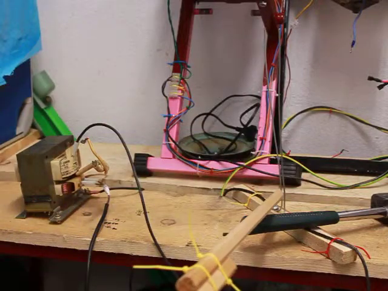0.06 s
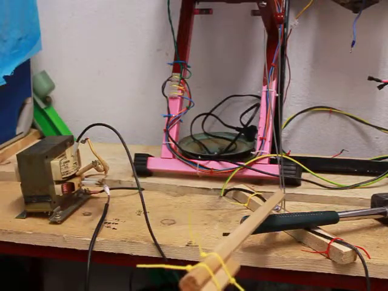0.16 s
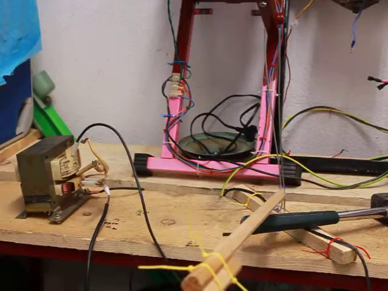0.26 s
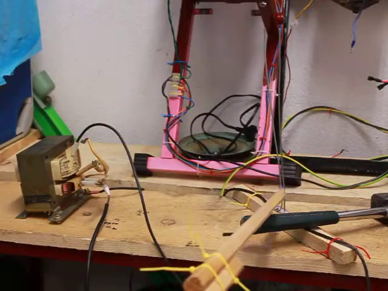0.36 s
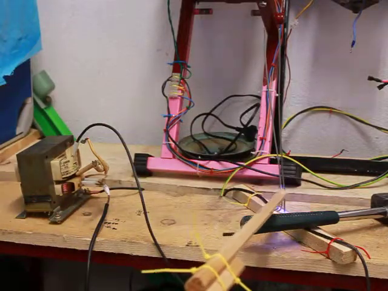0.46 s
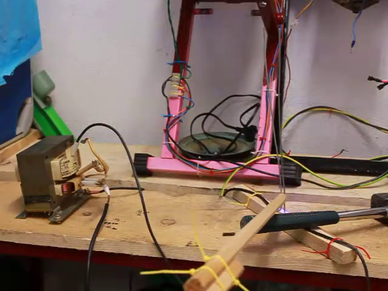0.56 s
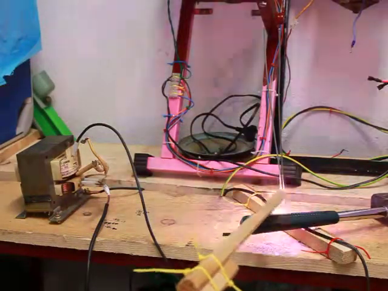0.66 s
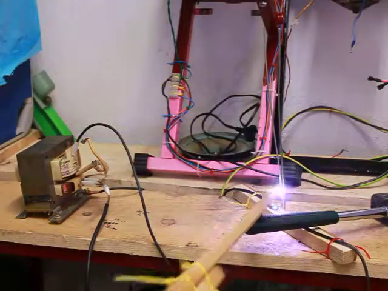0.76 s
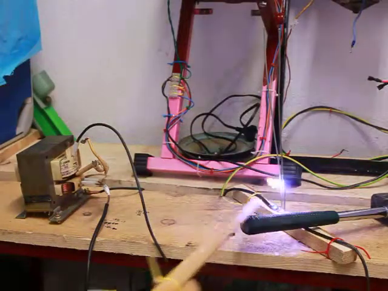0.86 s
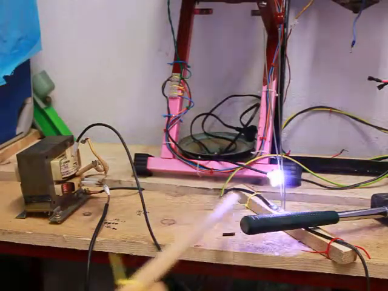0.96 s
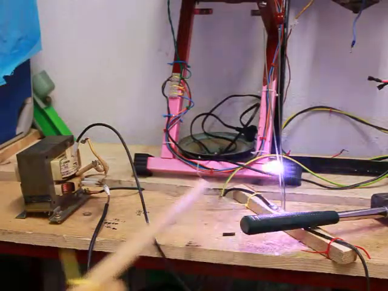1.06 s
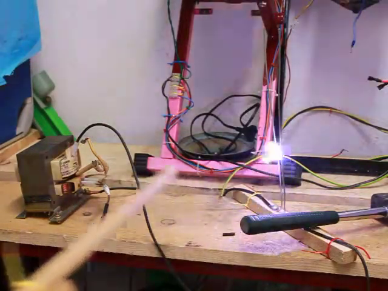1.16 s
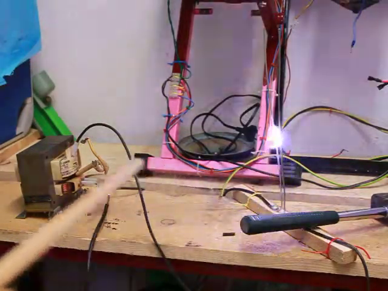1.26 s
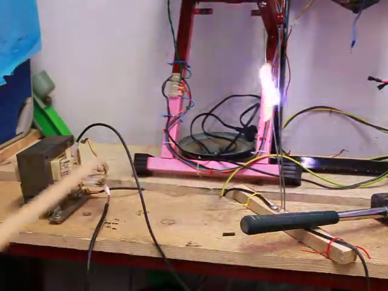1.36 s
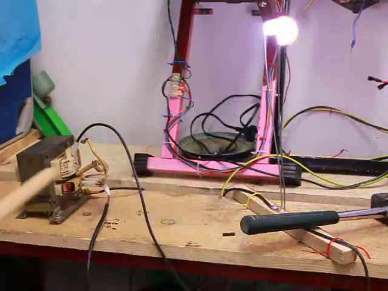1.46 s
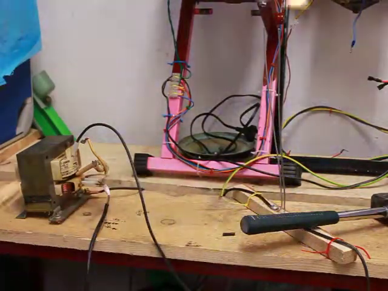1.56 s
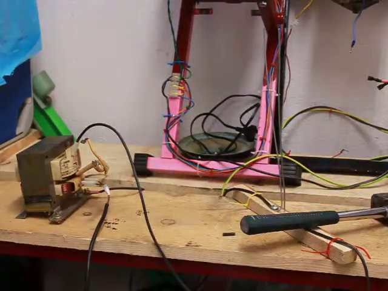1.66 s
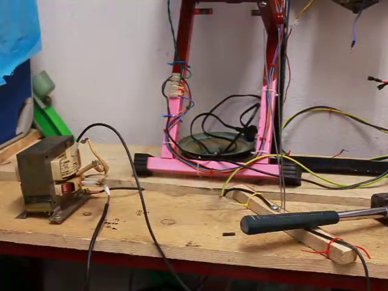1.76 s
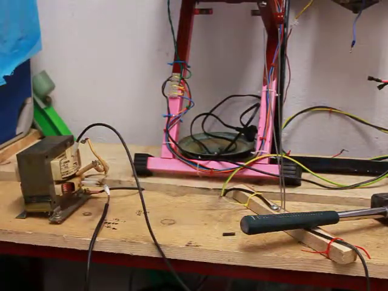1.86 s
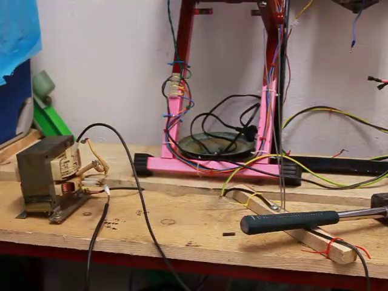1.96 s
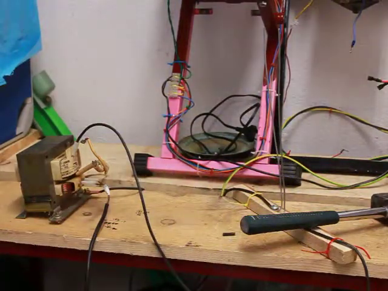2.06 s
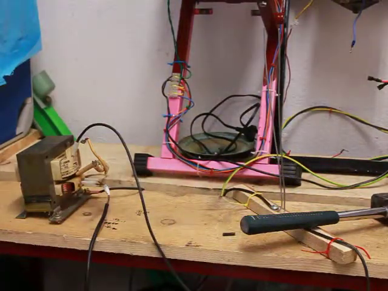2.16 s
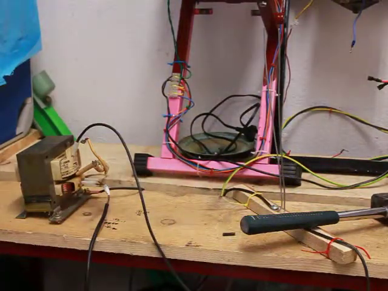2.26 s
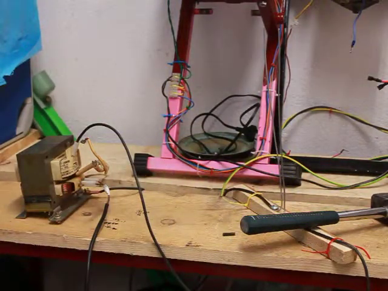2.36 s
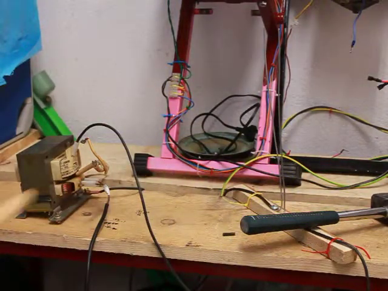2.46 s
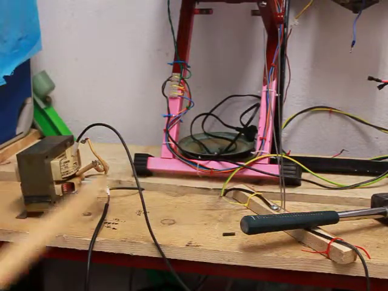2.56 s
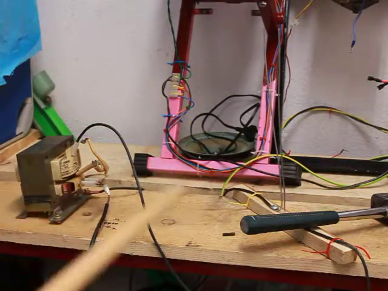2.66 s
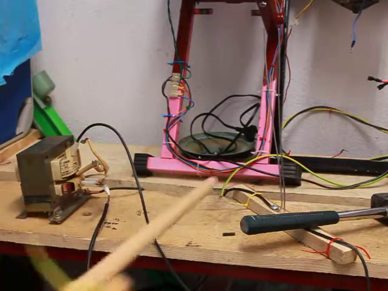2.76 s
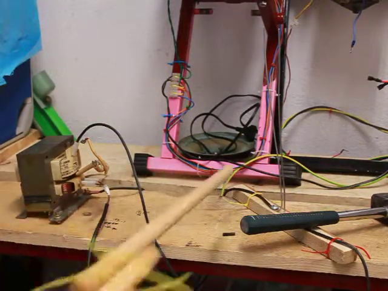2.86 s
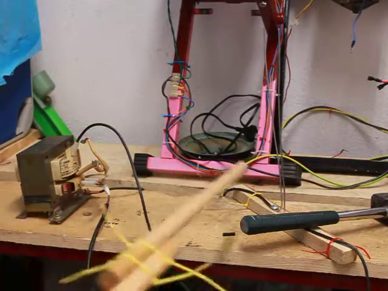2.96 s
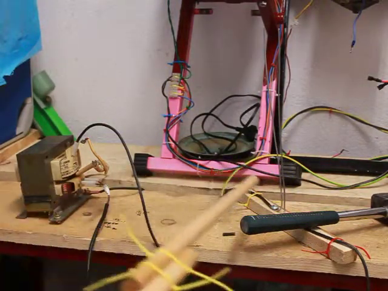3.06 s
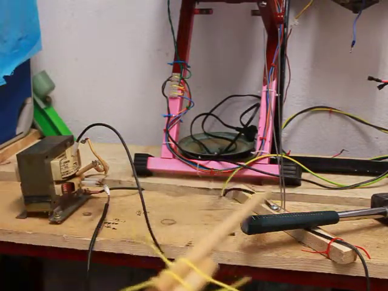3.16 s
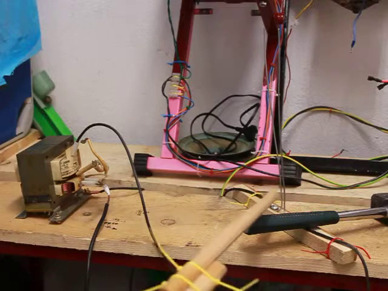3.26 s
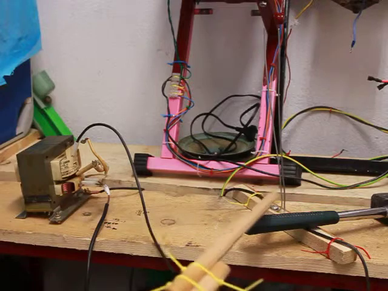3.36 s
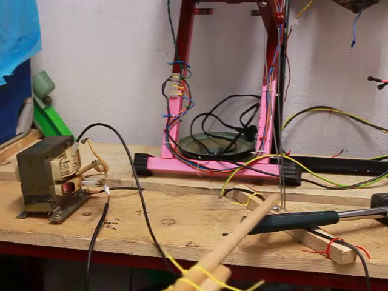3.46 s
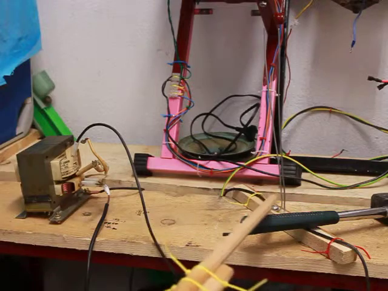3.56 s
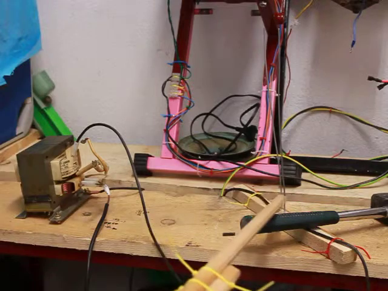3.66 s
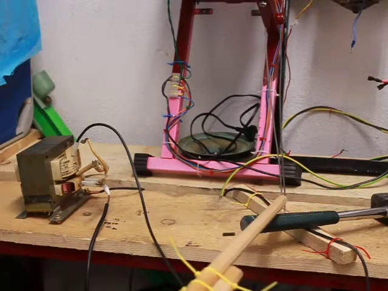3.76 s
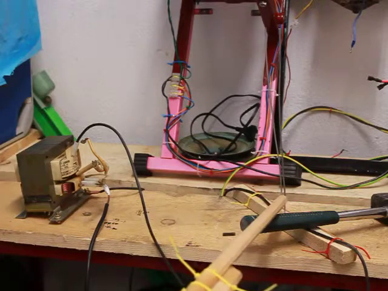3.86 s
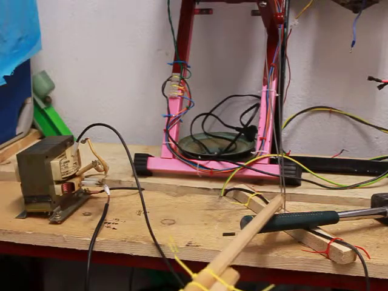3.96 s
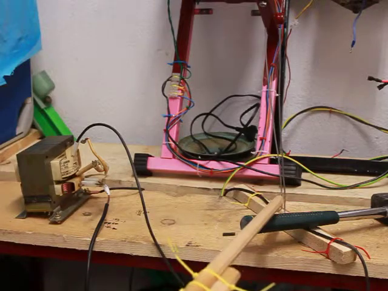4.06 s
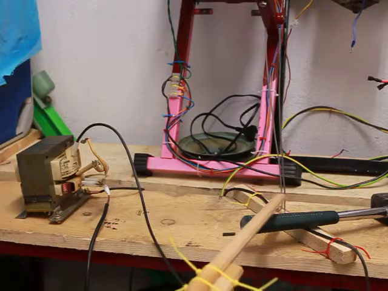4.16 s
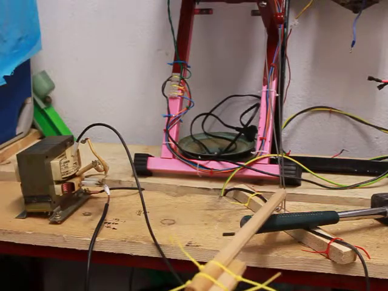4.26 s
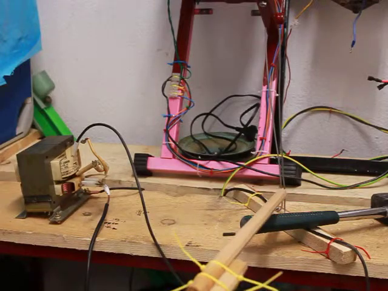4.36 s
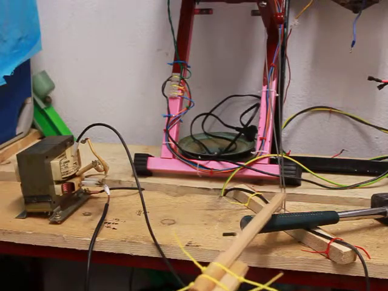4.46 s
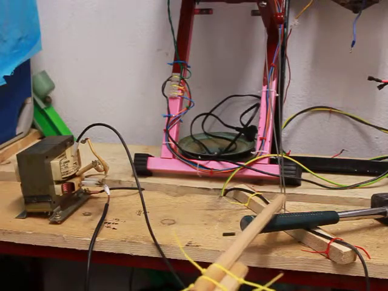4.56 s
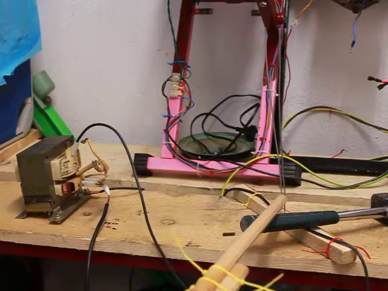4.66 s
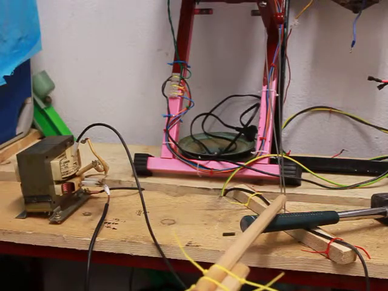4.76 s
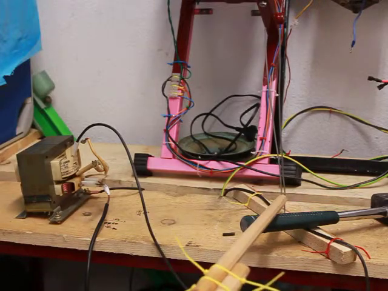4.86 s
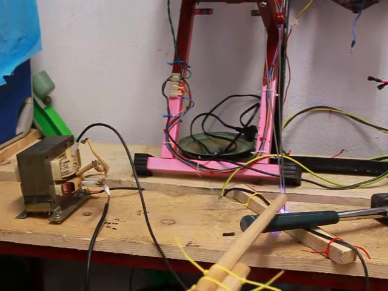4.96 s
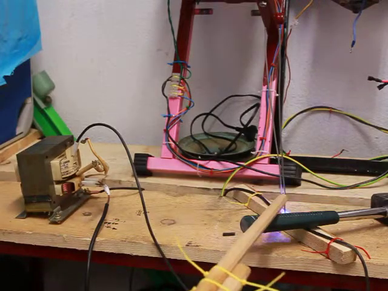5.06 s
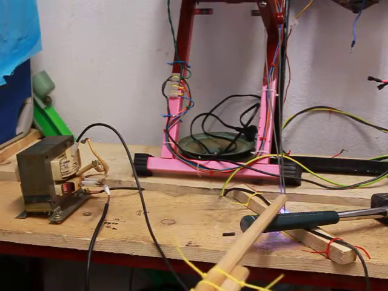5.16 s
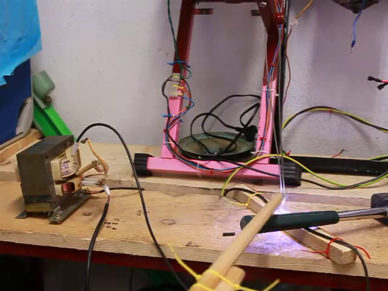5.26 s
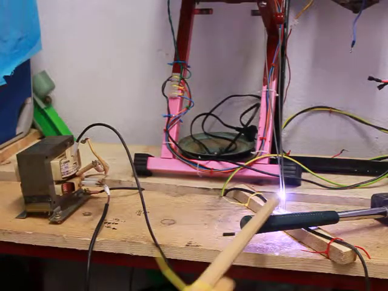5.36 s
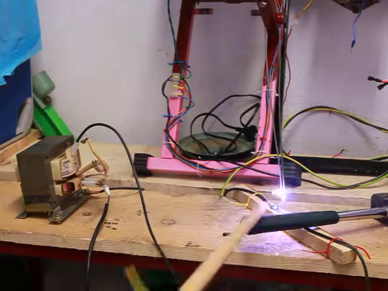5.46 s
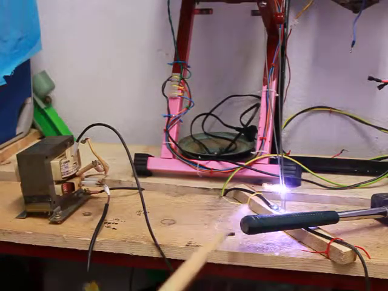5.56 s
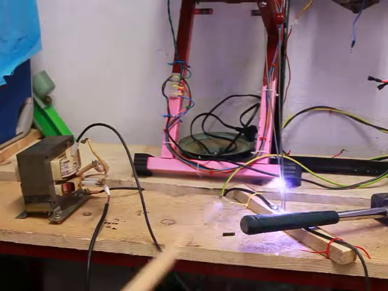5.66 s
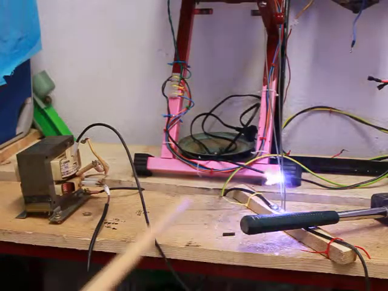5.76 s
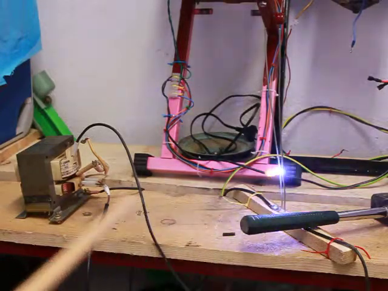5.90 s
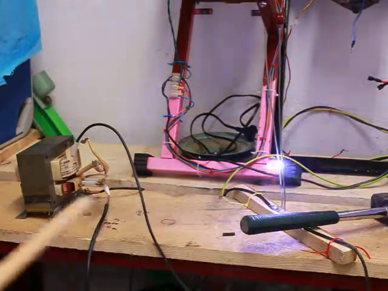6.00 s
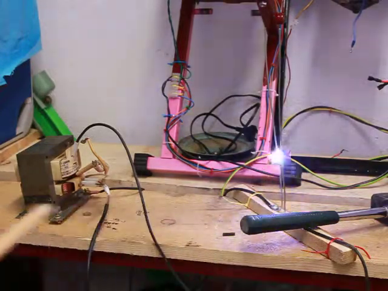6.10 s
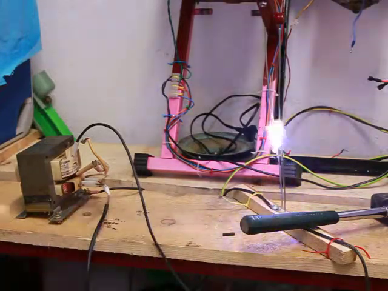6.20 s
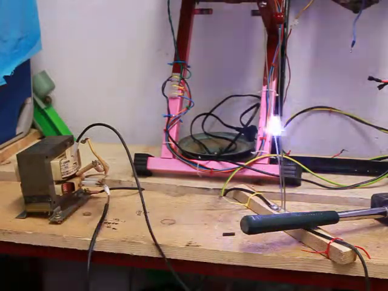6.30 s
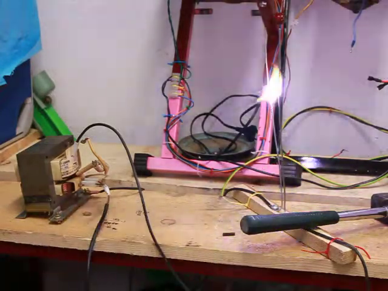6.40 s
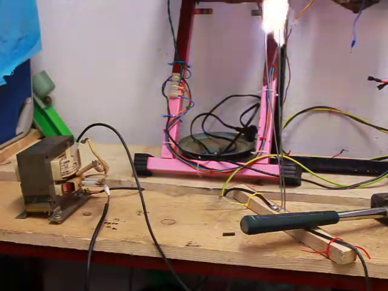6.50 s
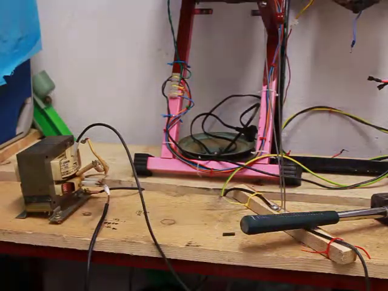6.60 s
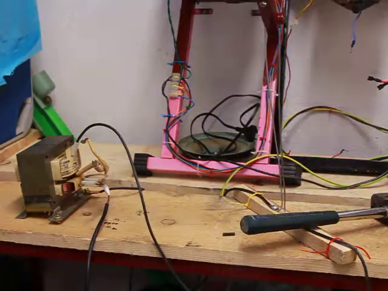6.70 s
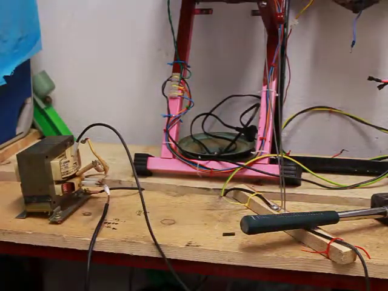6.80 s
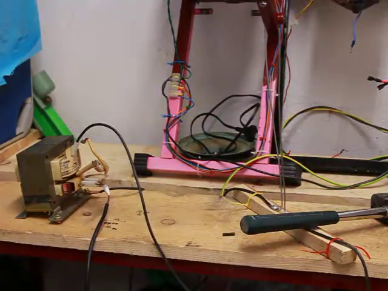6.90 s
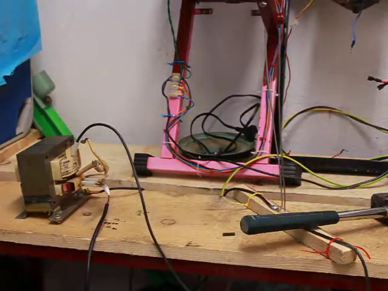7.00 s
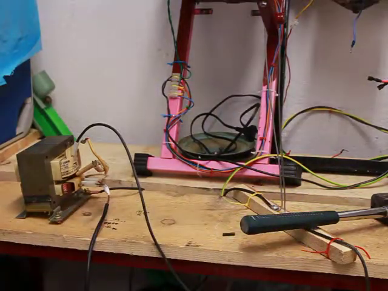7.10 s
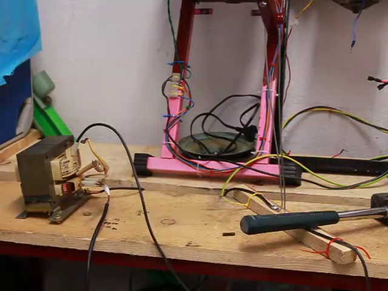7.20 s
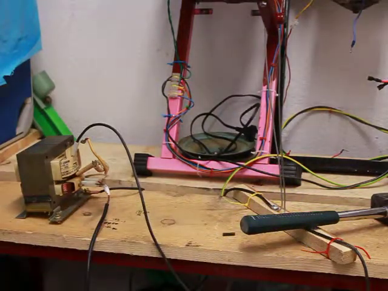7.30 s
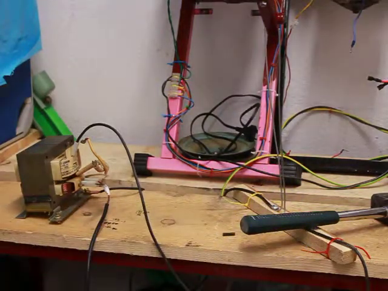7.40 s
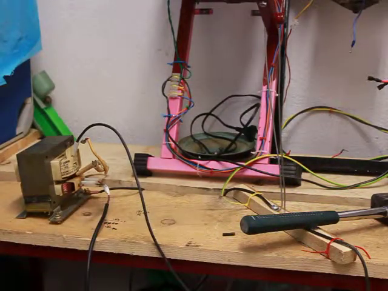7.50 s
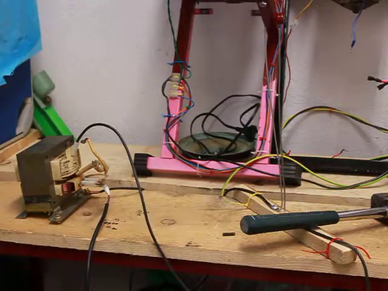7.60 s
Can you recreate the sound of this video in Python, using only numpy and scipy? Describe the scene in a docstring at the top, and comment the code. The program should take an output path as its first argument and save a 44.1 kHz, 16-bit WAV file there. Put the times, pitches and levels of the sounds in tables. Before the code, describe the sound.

Close view of a workbench in a small room, faint mains hum throughout. A nail on a stick taps thin wires, a spark snaps and a sizzling arc swells into a harsh buzz, grows fluttery and flamelike, and stops abruptly. Soft scraping, a click and light metallic taps follow, then sharper snaps start a second similar arc, which also cuts out, leaving only hum and room air.

```python
"""A nail on a wooden stick taps two upright wires over a faint transformer hum and the air of a workshop.
Twice it strikes an arc, which sizzles, buzzes at twice the mains rate, stretches into a flame and goes out.
The stick also rubs and clicks, and single sparks snap. Knocks, sparks and rubs are shaped noise, rings are
fading sine waves, and the arc is a train of pressure pulses with tiny clicks. All but hum and air,
and the arc's dry ticks, get a short room tail."""
import sys
import numpy as np
from scipy import signal
from scipy.fft import rfft, irfft, next_fast_len
from scipy.io import wavfile
from scipy.ndimage import uniform_filter1d

SR = 44100
rng = np.random.default_rng(int(sys.argv[2]) if len(sys.argv) > 2 else 0)


def store_wav(level_fs):
    """Save 16-bit WAV to argv[1]."""
    pcm = np.round(np.clip(np.atleast_2d(level_fs), -1, 1) * 32767)
    wavfile.write(sys.argv[1], SR, pcm.T.astype(np.int16))


N = 336924
T = np.arange(N) / SR  # time in seconds
MAINS_HZ = 50.03


def undb(db):
    """Turn decibels into a gain."""
    return np.exp(np.log(10) / 20 * np.asarray(db))


def unit(x):
    """Scale to an rms of 1."""
    return x / np.sqrt(np.mean(x ** 2))


def in_band(x, lo, hi):
    """Scale the whole sound so that its part between lo and hi Hz has an rms of 1."""
    f = np.fft.rfftfreq(len(x), 1 / SR)
    band = rfft(x)[(f > lo) & (f < hi)]
    return x * len(x) / np.sqrt(2 * np.sum(abs(band) ** 2))


def convolve(x, response):
    """Pass x through a response, keeping its length."""
    return signal.fftconvolve(x, response)[:len(x)]


def colour(x, points, size=4096):
    """Filter through (Hz, dB) points without smearing any sound ahead of its start."""
    hz, db = np.transpose(points)
    f = np.fft.rfftfreq(size, 1 / SR)
    curve_db = np.interp(np.log(f + 1), np.log(hz), db)
    # folding the cepstrum onto its first half gives the minimum-phase filter
    cepstrum = irfft(np.log(undb(curve_db)))
    cepstrum[1:size // 2] *= 2
    cepstrum[size // 2 + 1:] = 0
    return convolve(x, irfft(np.exp(rfft(cepstrum))))


def walk(rate):
    """Wander at random with a spread near 1, heading for a new value rate times a second."""
    knots = rng.standard_normal(int(T[-1] * rate) + 2)
    return np.interp(T * rate, np.arange(len(knots)), knots)


def fade(t, t60):
    """Die away by 60 dB in t60 seconds."""
    return np.exp(-np.log(1000) * t / t60)


def ramp(start, end):
    """Rise from 0 to 1 between two times."""
    return np.clip((T - start) / (end - start), 0, 1)


def swell(s, half_s):
    """Rise smoothly to 1 at time s and fall back."""
    return np.exp(-np.minimum(((T - s) / half_s) ** 2, 20))


def add(track, s, sound):
    """Mix a sound into a track at time s."""
    i = max(int(s * SR), 0)
    track[i:i + len(sound)] += sound[:N - i]


def grains(per_s, spread_db):
    """Tiny clicks at random times, most of them small and a few large."""
    sizes = undb(spread_db * np.minimum(rng.exponential(size=N), 5))
    present = rng.random(N) < per_s / SR
    return unit(present * sizes * rng.choice([-1, 1], N))


def ring(modes, low_db=0, high_db=0):
    """Metal or wood rings after one blow; chance shifts each mode's pitch a little and its level."""
    t = T[:SR // 2]
    total = 0
    chance = rng.standard_normal((len(modes), 2)) * [2.8, .006]  # dB, share of the pitch
    for (hz, db, t60), (luck_db, shift) in zip(modes, chance):
        level_db = db + (high_db if hz > 4300 else low_db) + luck_db
        tone = np.sin(2 * np.pi * (hz * (1 + shift) * t + rng.random()))
        total = total + undb(level_db) * fade(t, t60) * tone
    return total


def workshop(x, wet_db, low_t60=0.25, high_t60=0.13):
    """The room adds a dense short tail, whose treble dies first, to the direct sound."""
    t = T[:SR // 2]
    noise = rng.standard_normal(len(t))
    low = signal.sosfilt(signal.butter(1, 4000, fs=SR, output="sos"), noise)
    tail = low * fade(t, low_t60) + (noise - low) * fade(t, high_t60)
    tail *= t > .002  # the tail starts after 2 ms
    response = undb(wet_db) * tail / np.linalg.norm(tail)
    response[0] = 1  # direct sound
    return convolve(x, response / np.linalg.norm(response))


# The tones of the humming iron core.
# Each row: multiple of the mains rate, rms level in dB around which it wavers while no arc burns.
HUM_TONES = [(2, -71), (4, -52.5), (5, -80.5), (6, -66), (8, -70), (10, -63.5), (14, -76.5), (16, -79.5),
             (20, -73), (24, -78)]


def hum(load):
    """The iron core flexes with the mains and wavers slightly; current drawn by an arc makes it hum harder."""
    total = 0
    for k, db in HUM_TONES:
        tone = np.sin(2 * np.pi * (k * MAINS_HZ * T + rng.random()))
        total = total + np.sqrt(2) * undb(db + 0.4 * walk(24.0)) * tone
    return total * undb(4.7 * load)


# The tone colour of the room noise. Each row: frequency in Hz, relative level in dB.
AIR_COLOUR = [(25, 20), (60, 3.5), (110, 9.5), (230, 16), (420, 8.5), (700, 8), (2000, 5.5), (4500, 3.5),
              (9000, -1), (16000, -4)]
AIR_DB = -60.5  # rms level between 1 and 15 kHz


def air():
    """Faint, nearly steady room noise is made of coloured random values."""
    noise = in_band(colour(rng.standard_normal(N), AIR_COLOUR), 1000, 15000)
    return noise * undb(AIR_DB + 0.13 * walk(6.9))


# The moments when the nail meets the wires.
# Each row: start in seconds, then levels in dB before the room: clack, low ring, high ring, bright tick.
NAIL_TAPS = [(0.0014, -35.5, -47.5, -48, -35), (0.173, -28, -40, -46, -29.5),
             (0.2125, -31.5, -47.5, -53, -30.5), (3.7208, -37.5, -63, -62, -71),
             (4.139, -36.5, -51, -53, -53), (4.25, -34.5, -43, -51, -42), (4.6382, -47, -60, -51.5, -69),
             (4.711, -42, -54, -52, -51), (4.748, -50, -68, -50, -48.5), (4.874, -40, -46, -41, -34.5),
             (4.916, -45, -51, -44, -24.5)]
# The ways the nail and wires ring together.
# Each row: pitch in Hz, relative level in dB, time to fade by 60 dB in seconds.
WIRE_MODES = [(1191.3, 0.5, 0.073), (1605, 0, 0.094), (1785, -1, 0.072), (1945, 3, 0.046), (2680, -6, 0.13),
              (2750, -8.5, 0.14), (3190, -8.5, 0.24), (3634, -4.5, 0.17), (4000, -9, 0.11),
              (4630, -5.5, 0.18), (4860, -11, 0.35), (5170, -20, 0.18), (7700, -16, 0.17), (8230, -21, .14),
              (8700, -18, 0.2), (10700, -32, 0.12), (12080, -23, 0.16)]
# The ways the nail itself pings on its hardest landing.
# Each row: pitch in Hz, relative level in dB, time to fade by 60 dB in seconds.
NAIL_MODES = [(4360, -1.5, 0.097), (5250, -6, 0.078), (5400, -1, 0.072)]
PING_S, PING_DB = 4.916, -34  # start in seconds, level added to the nail's modes


def taps():
    """The nail knocks on the wires: a short clack, a bright tick and the ring of the metal."""
    t, knocks, rings = T[:SR // 2], np.zeros(N), np.zeros(N)
    clack_colour = [(40, -63), (200, -2), (800, -10.0), (1300, -1.5), (2000, 1), (2800, -2.5),
                    (4500, -9), (7000, -15.0), (15000, -26)]
    tick_colour = [(60, -19), (1000, -12.5), (5000, -4.0), (10000, 1.0), (16000, -7.5)]
    for s, clack_db, low_db, high_db, tick_db in NAIL_TAPS:
        add(rings, s, ring(WIRE_MODES, low_db, high_db))
        clack = unit(colour(rng.standard_normal(len(t)), clack_colour))
        tick = unit(colour(rng.standard_normal(len(t)), tick_colour))
        add(knocks, s, undb(clack_db) * clack * fade(t, 0.026))
        add(knocks, s, undb(tick_db) * tick * fade(t, 0.048))
    add(rings, PING_S, undb(PING_DB) * ring(NAIL_MODES))
    return workshop(knocks, wet_db=3.0) + workshop(rings, wet_db=-4.5)


# The stick slides and rubs. Each row: strongest moment, swell and release in seconds,
# then levels in dB at that moment, before the room: bench rumble, scrape, hiss.
STICK_RUBS = [(0.157, 0.06, 0.016, -80, -46, -75), (2.352, 0.04, 0.052, -61, -57.5, -46.5),
              (2.444, 0.047, 0.048, -70, -56, -49.5), (2.606, 0.032, 0.086, -49, -51.5, -55),
              (2.72, 0.16, .07, -83, -65, -55), (4.505, 0.11, 0.041, -63, -51, -66)]
RUB_EDGE_DB = -19.5  # level of a rub, against its peak, where its swell begins and its release ends


def strokes():
    """Each rub swells and dies away: the gains of its rumble, scrape and hiss."""
    total = 0
    for s, swell_s, release_s, rumble_db, scrape_db, hiss_db in STICK_RUBS:
        away = np.maximum((s - T) / swell_s, (T - s) / release_s)
        shape = undb(RUB_EDGE_DB * np.minimum(away ** 2, 10))
        total = total + np.outer(undb([rumble_db, scrape_db, hiss_db]), shape)
    return total


def rubs():
    """The stick drags over bench and wire in fine grains that set the wire ringing."""
    rumble_gain, scrape_gain, hiss_gain = strokes()
    friction = grains(3000, spread_db=2.0)
    rumble = colour(friction, [(60, -18), (180, -14), (320, 5), (700, -2.5), (1300, 1.0), (3000, -27)])
    ringing = unit(convolve(friction, ring(WIRE_MODES)))
    scrape = colour(ringing + 2.1 * friction, [
        (100, -38), (1100, -11), (1900, -1.0), (2700, 0.5), (3200, 0), (3800, -1.0),
        (4700, -11), (6000, -20), (12000, -50)])
    hiss = colour(friction, [(1000, -68), (5000, 6.5), (12000, 8.0), (16000, 10.0)])
    mix = unit(rumble) * rumble_gain + unit(scrape) * scrape_gain + unit(hiss) * hiss_gain
    return workshop(mix, wet_db=-2.0)


# Single sparks.
# Each row: start in seconds, peak level in dB before the room, treble against the middle in dB.
SINGLE_SPARKS = [(0.3996, -16, 13.5), (0.8693, -12, -10), (2.9316, -21.5, -0.5), (3.127, -19, 18),
                 (4.9474, -5.5, 9), (5.2110, -4, 5), (5.227, -6, 2), (6.227, 0.5, -8.5),
                 (6.2541, -4.5, -12)]


def sparks():
    """A spark snaps with a sharp front and a millisecond of noise; short gaps sound thin, long ones full."""
    t, track = T[:SR // 10], np.zeros(N)
    for s, peak_db, treble_db in SINGLE_SPARKS:
        burst = rng.standard_normal(len(t)) * fade(t, 0.0013)
        burst[0] = 4  # sharp front
        snap = colour(burst, [(40, -60), (200, -40), (700, -2.0), (1400, 2.0), (2200, -1), (4500, 3.5),
                              (9000, treble_db / 2), (13000, treble_db)])
        add(track, s, undb(peak_db) * snap / abs(snap).max())
    return workshop(track, wet_db=3.0)


DRAW_S = 0.022  # the nail takes this many seconds to pull clear


def life(struck, drawn, stretches, out):
    """Stages of an arc, each 0-1: it burns, the gap creeps open, the nail pulls clear, it climbs, it stretches."""
    burning = uniform_filter1d(1. * (T > struck) * (T < out), size=64)  # softened edges
    creep = ramp(struck, drawn)
    clear = ramp(drawn - DRAW_S / 2, drawn + DRAW_S / 2)
    return burning, creep, clear, ramp(drawn, out), ramp(stretches, out)


# The two arcs. Each row: struck, nail drawn away, starts to stretch and goes out, all in seconds;
# basic levels of buzz, flame, crackle and sizzle in dB, which the stages of the arc then change;
# how much unevenness of the firings (a plain number) full stretch brings.
ARC_LIVES = [(0.4, 0.651, 1.074, 1.535, -33.5, -34.5, -38, -33, 1.25),
             (4.948, 5.233, 6.07, 6.528, -35, -34.5, -37, -32.5, 0.99)]
# The stretched flame roars up.
# Each row: strongest moment in seconds, half length in seconds, level in dB.
ROAR_BURSTS = [(1.367, 0.018, -31), (1.406, 0.018, -31.5), (1.495, 0.021, -27.5), (6.247, 0.024, -30),
               (6.322, 0.027, -34), (6.464, 0.046, -32.5)]
ROAR_DB = -40.5  # steady roar of a fully stretched flame
# changes in dB: while the nail touches, as the gap creeps open, from foot to top of the wires, by full stretch
TOUCH_BUZZ_DB, CREEP_BUZZ_DB, CREEP_CRACKLE_DB = -26.5, -6.5, 15
CLIMB_CRACKLE_DB, CLIMB_SIZZLE_DB = -2.5, -8
STRETCH_BUZZ_DB, STRETCH_FLAME_DB, STRETCH_CRACKLE_DB, STRETCH_SIZZLE_DB = -5.5, -4.5, -3.5, -3
FLAME_GROWTH = 0.43  # the flame's strength goes with this power of the stretch
CLIMB_FLAME_SHARE = 0.14  # a faint flame already builds while the arc climbs
STRUCK_UNREST, BURNING_UNREST = 0.32, .27  # unevenness of the firings: when struck, and at the least


def arc_controls():
    """A short arc sizzles, a drawn one buzzes, a stretched one flutters and roars and draws less current."""
    total = 0
    bursts = sum(undb(db) * swell(s, half_s) for s, half_s, db in ROAR_BURSTS)
    for (struck, drawn, stretches, out,
         buzz_db, flame_db, crackle_db, sizzle_db, last_unrest) in ARC_LIVES:
        burning, creep, clear, climb, stretch = life(struck, drawn, stretches, out)
        buzz = undb(buzz_db + TOUCH_BUZZ_DB * (1 - clear) - CREEP_BUZZ_DB * (1 - creep)
                    + STRETCH_BUZZ_DB * np.sqrt(stretch))
        flame_size = np.maximum(stretch ** FLAME_GROWTH, CLIMB_FLAME_SHARE * climb)
        flame = undb(flame_db + STRETCH_FLAME_DB * stretch ** 2) * flame_size
        roar = np.hypot(undb(ROAR_DB) * np.sqrt(stretch), bursts)
        crackle = undb(crackle_db - CREEP_CRACKLE_DB * (1 - creep) + CLIMB_CRACKLE_DB * climb
                       + STRETCH_CRACKLE_DB * stretch ** 2)
        sizzle = undb(sizzle_db + CLIMB_SIZZLE_DB * climb + STRETCH_SIZZLE_DB * stretch ** 2)
        uneven = STRUCK_UNREST * (1 - creep) + last_unrest * stretch ** 1.27
        unrest = np.maximum(BURNING_UNREST, uneven)
        load = np.sqrt(creep) * (1 - stretch) ** 4
        total = total + burning * np.array([buzz, flame, roar, crackle, sizzle, stretch, unrest, load])
    return total


# The arc flares up (+) or gutters (-). Each row: strongest moment in seconds, half length in seconds,
# change of buzz and flame in dB, change of crackle and sizzle in dB.
ARC_FLARES = [(0.428, 0.017, -11, -6.5), (0.548, 0.068, 12, 4), (0.6, 0.021, -7, -9.5),
              (0.647, 0.024, -2, 1.5), (0.973, 0.018, 3, -4), (1.132, 0.046, 4, -1.5),
              (1.25, 0.022, 3, 4.5), (1.333, 0.05, 3.5, 3), (1.448, 0.012, -6, -8), (1.495, 0.01, -0.5, -4),
              (5.004, 0.036, 0, -3), (5.228, 0.011, 12, 5.5), (5.62, 0.021, 1, 0.5),
              (5.722, 0.038, -3.5, 0.5), (5.828, 0.035, 4, -2), (6.202, 0.022, 5, -1.5),
              (6.34, .015, -4, 1.5)]


def flares():
    """The arc briefly flares or gutters: the gains of its drone and of its micro-sparks."""
    total_db = 0
    for s, half_s, drone_db, sparks_db in ARC_FLARES:
        total_db = total_db + np.outer([drone_db, sparks_db], swell(s, half_s))
    return undb(total_db)


def firings(unrest, jitter_s, scatter_db, polarity_db):
    """The arc relights every half cycle; a restless one does so unevenly, and one polarity is stronger."""
    k = np.arange(1, int(T[-1] * 2 * MAINS_HZ))
    s = k / (2 * MAINS_HZ)
    late, strength = rng.standard_normal((len(k), 2)).T * np.interp(s, T, unrest)
    return s + jitter_s * late, undb(scatter_db * strength + polarity_db * (-1) ** k)


def pulse_train(times, sizes, shape):
    """Lay one pulse, shape(seconds from its middle), at each firing."""
    at = (times * SR).astype(int)[:, None] + np.arange(-200, 201)
    pulses = sizes[:, None] * shape(at / SR - times[:, None])
    return np.bincount(np.clip(at, 0, N - 1).ravel(), pulses.ravel(), N)


def swing(t, hz, cycles):
    """A pressure pulse: a swell and a collapse; the number of cycles sets how soon it fades."""
    return -np.sin(2 * np.pi * hz * t) * np.exp(-(hz * t / cycles) ** 2)


def scatter(x, echoes):
    """Bench and walls repeat each pulse without colouring it: all-pass echoes (seconds, share)."""
    size = next_fast_len(N + SR)
    f, spectrum = np.fft.rfftfreq(size, 1 / SR), rfft(x, size)
    for lag, share in echoes:
        delay = np.exp(-2j * np.pi * f * lag)
        spectrum = spectrum * (share + delay) / (1 + share * delay)
    return irfft(spectrum, size)[:N]


def wandering(x, wet_db, low_t60, count=4):
    """The arc moves about: mixing several room tails in changing shares makes each partial waver on its own."""
    shares = np.array([undb(12 * walk(7)) for _ in range(count)])
    return sum(workshop(x * share, wet_db, low_t60) for share in shares / shares.sum(axis=0))


# The tones of the buzz. Each row: multiple of the firing rate (twice the mains rate), relative level in dB.
BUZZ_TONES = [(1, -14), (2, -24), (3, -10.5), (4, -5.5), (5, -3.5), (6, -3.5), (7, 3), (8, 5.5), (9, 0),
              (10, 2.5), (11, 1), (12, -7), (13, -14), (14, -3), (15, -4.5), (16, -4.5), (17, -3.5),
              (18, -8), (19, -2.5), (20, -10), (21, -6), (22, -10), (23, -13), (24, -7.5), (25, -12),
              (26, -10)]
# The tone colours of flame, roar, crackle and sizzle. Each row: frequency in Hz, relative level in dB.
FLAME_COLOUR = [(30, -3), (110, 1.5), (180, 2), (280, 1.5), (420, 3.5), (750, 4), (1000, 6), (1500, -4),
                (3000, 5)]
ROAR_COLOUR = [(30, -4), (120, -10), (400, -5), (750, 5), (1050, 1.5), (1500, -1.5), (2000, -7),
               (3000, -22.5), (6000, -24), (14000, -35)]
CRACKLE_COLOUR = [(30, -36), (70, -15), (115, -9), (180, 1.5), (400, -4), (1000, -0.5), (1400, -1.5),
                  (2200, 1.5), (3500, 1.5), (6000, -3), (10000, -7), (16000, -14)]
SIZZLE_COLOUR = [(30, -75), (100, -42), (1000, -10.5), (4000, -6.5), (6500, -5.5), (9000, -0.5),
                 (12500, 2.5), (16000, 0)]
TAUT_PULSE_HZ, STRETCHED_PULSE_HZ = 686, 293  # swing of a pulse in a short and in a fully stretched arc
RELIGHT_DB, RELIGHT_S = 4, .00006  # tick of each firing: gain over the buzz control, half width in seconds


def arc(buzz_gain, flame_gain, roar_gain, crackle_gain, sizzle_gain, stretch, unrest):
    """Each firing heats the air into a pressure pulse; micro-sparks crackle and sizzle at the arc's feet."""
    drone_flare, sparks_flare = flares()
    times, sizes = firings(unrest, jitter_s=0.00017, scatter_db=4.5, polarity_db=1.0)
    surge = np.cos(2 * np.pi * MAINS_HZ * T) ** 8  # peaks every half cycle
    # the sharp front of each pulse makes the buzz and a dry tick
    buzz_colour = [(30, -78.5), (60, -53)]
    buzz_colour += [(2 * MAINS_HZ * k, db) for k, db in BUZZ_TONES]
    buzz_colour += [(3700, -13.5), (5500, -21.0), (12000, -31)]
    fronts = pulse_train(times, sizes, lambda t: np.sinc(t * SR))
    buzz = in_band(colour(fronts, buzz_colour), 650, 1150) * buzz_gain
    ticks = pulse_train(times, sizes, lambda t: -np.exp(-(t / RELIGHT_S) ** 2))
    ticks = ticks * undb(RELIGHT_DB) * buzz_gain
    # the hot channel swells and collapses; the longer it is, the slower the swing
    length = np.interp(times, T, stretch)[:, None]
    hz = TAUT_PULSE_HZ + (STRETCHED_PULSE_HZ - TAUT_PULSE_HZ) * np.sqrt(length)
    cycles = 0.6 - 0.12 * length
    swings = pulse_train(times, sizes, lambda t: swing(t, hz, cycles))
    flame = in_band(colour(swings, FLAME_COLOUR), 270, 620) * flame_gain
    # a long channel relights with a turbulent puff, here as strong as the clean fronts
    puffs = unit(fronts) + unit(surge * rng.standard_normal(N))
    roar = in_band(colour(puffs, ROAR_COLOUR), 650, 2200) * roar_gain
    # micro-sparks come in a fine stream, louder around the moment of relighting
    crackle_swell = undb(4.9 * surge) * undb(1.8 * walk(70))
    crackle = colour(grains(3000, spread_db=2.8) * crackle_swell, CRACKLE_COLOUR)
    crackle = in_band(crackle, 2000, 5000) * crackle_gain
    sizzle_swell = undb(2.3 * surge + 1.0 * walk(70))
    sizzle = colour(grains(4500, spread_db=4.5) * sizzle_swell, SIZZLE_COLOUR)
    sizzle = in_band(sizzle, 8000, 15500) * sizzle_gain
    # the room answers each part
    echoes = [(.0029, 0.36), (.0053, 0.73), (.0087, 0.68)]
    buzz = wandering(scatter(buzz * drone_flare, echoes), wet_db=-4, low_t60=0.33)
    flame = wandering(scatter(flame * drone_flare, echoes), wet_db=-2.5, low_t60=0.28)
    roar = wandering(roar, wet_db=4.5, low_t60=0.24)
    return ticks + buzz + flame + roar + workshop((crackle + sizzle) * sparks_flare, wet_db=2.0)


# The wooden stick clicks.
# Each row: start in seconds, peak level in dB before the room, pitch in Hz, ring level in dB.
STICK_CLICKS = [(2.313, -34, 4700, -64), (3.3403, -33, 2900, -45.5)]
# The ways the stick rings. Each row: pitch in Hz, relative level in dB, time to fade by 60 dB in seconds.
STICK_MODES = [(1750, -6, 0.067), (2260, -1, 0.068), (2450, -4, 0.082), (3640, -6, 0.091),
               (3910, -2, 0.085)]


def clicks():
    """The wooden stick clicks, a short burst of coloured noise, and rings briefly."""
    t, track = T[:SR // 10], np.zeros(N)
    for s, peak_db, hz, ring_db in STICK_CLICKS:
        burst = rng.standard_normal(len(t)) * fade(t, 0.024)
        click = colour(burst, [(100, -35), (800, -18), (1400, -5), (hz, 0), (5300, -5),
                               (6500, -22), (15000, -32)])
        add(track, s, undb(peak_db) * click / abs(click).max())
        add(track, s, undb(ring_db) * ring(STICK_MODES))
    return workshop(track, wet_db=-11)


def scene():
    """Everything reaches one microphone, heard alike on both sides."""
    *controls, load = arc_controls()
    mono = hum(load) + air() + taps() + rubs() + sparks() + arc(*controls) + clicks()
    return np.array([mono, mono])


TOP_HZ = 15900  # treble limit of the recorder


def record(dry):
    """The microphone sheds the deep bass and the recorder cuts the top."""
    thin = signal.sosfilt(signal.butter(3, 60, "high", fs=SR, output="sos"), dry)
    return signal.sosfilt(signal.ellip(10, .2, 80, TOP_HZ, fs=SR, output="sos"), thin)


dry = scene()
out = record(dry)
store_wav(out)
```